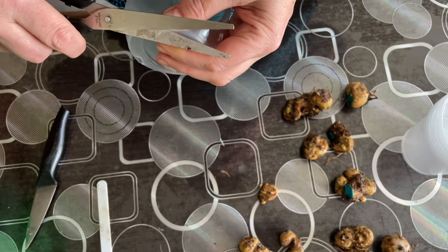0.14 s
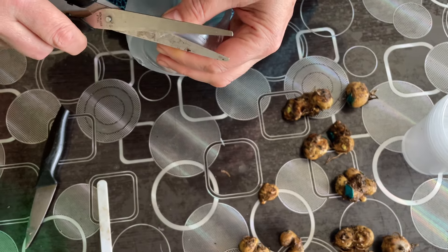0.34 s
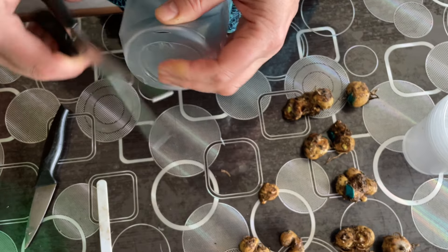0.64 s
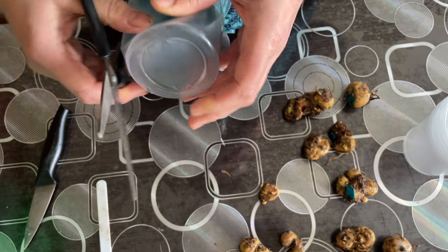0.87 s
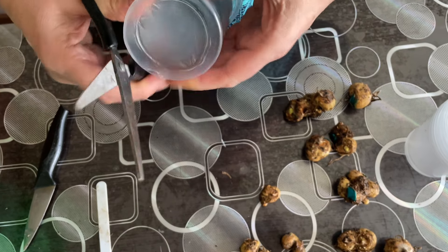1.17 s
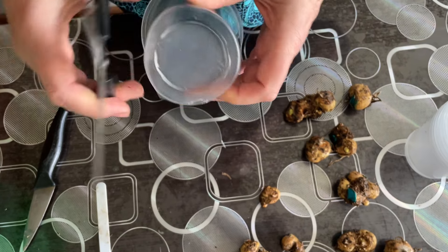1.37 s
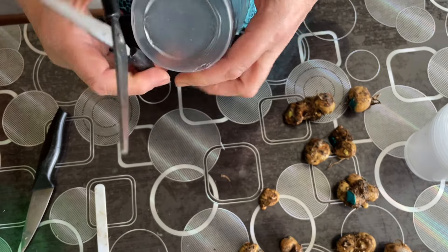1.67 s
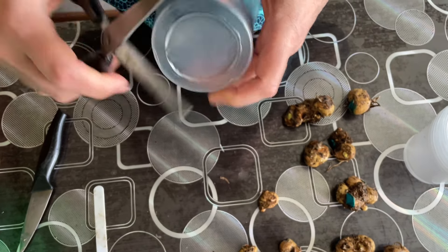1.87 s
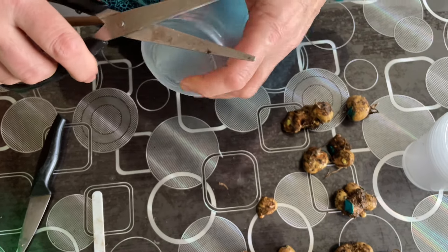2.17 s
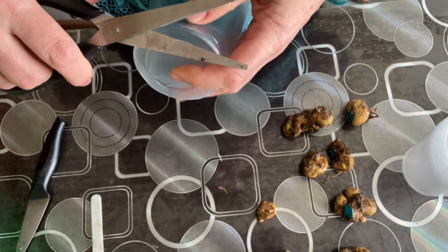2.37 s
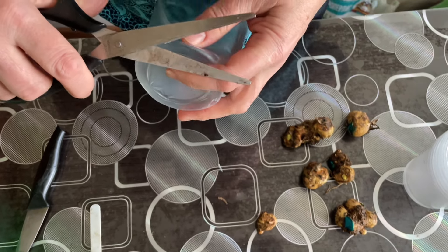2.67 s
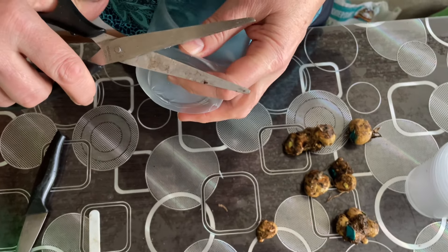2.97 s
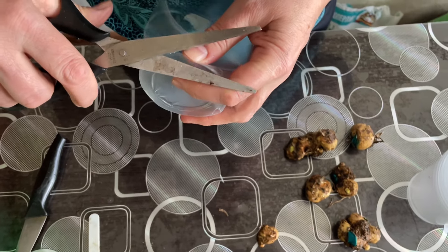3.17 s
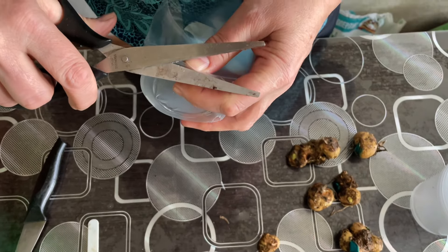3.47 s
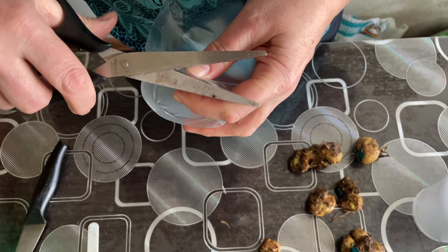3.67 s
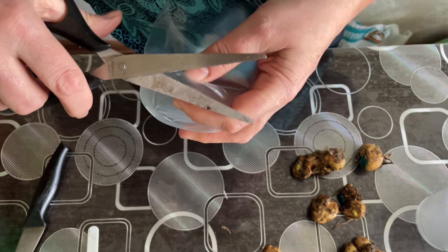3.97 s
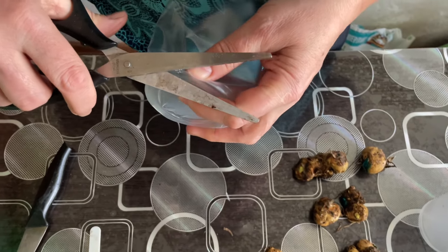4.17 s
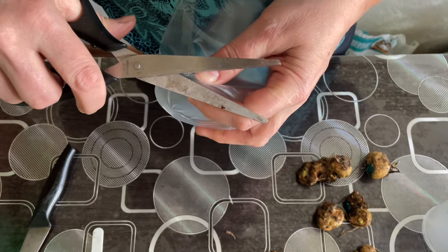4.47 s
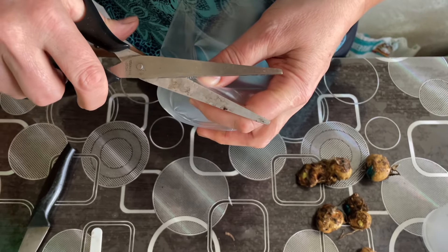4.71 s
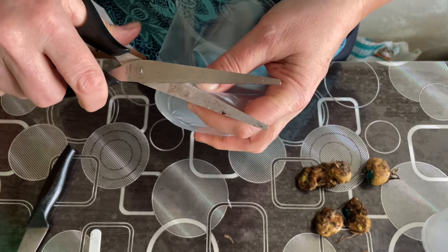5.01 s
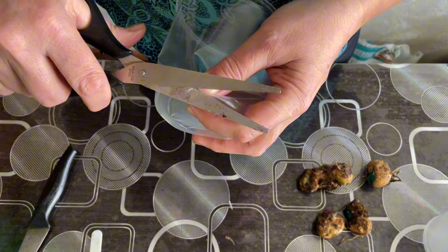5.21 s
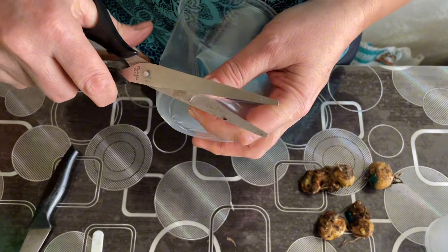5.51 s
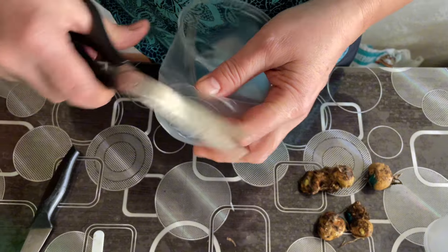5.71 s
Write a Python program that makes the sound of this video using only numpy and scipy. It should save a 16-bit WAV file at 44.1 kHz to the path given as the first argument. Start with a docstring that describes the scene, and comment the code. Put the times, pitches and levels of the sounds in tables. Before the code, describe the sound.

Sharp plastic snaps with bright metallic edge ticks, each with a short hollow ring and low thump like a quick falling chirp. They burst out densely at first, mixed with gritty scraping, then give way to softer buckling pops and occasional snips. Near the end it is almost silent before a few last cuts. Close stereo microphone, short indoor reflections, dull handling noise underneath.

```python
"""Small room: large steel scissors cut a thin plastic cup held over a table, close to the microphone.
Each cut or buckle is a noise crack, modal wall ring and gliding base thump, dispersed into a falling chirp;
cuts add a bright noise tick. Between snaps, noise grained by random slips makes the blades' scrape strokes.
Filtered noise is the hands' rumble and still air; sine swells are hollow booms; diffuse echoes are the room."""
import sys
import numpy as np
from scipy import signal
from scipy.fft import rfft, irfft, next_fast_len
from scipy.io import wavfile
from scipy.ndimage import uniform_filter1d, minimum_filter1d

SR = 44100
rng = np.random.default_rng(int(sys.argv[2]) if len(sys.argv) > 2 else 0)


def waveform_to_disk(signal):
    """Save audio, clipped to [-1, 1], as 16-bit WAV at the path in sys.argv[1]."""
    frames = np.transpose(np.atleast_2d(signal))
    scaled = np.clip(frames, -1, 1) * 32767
    samples = np.round(scaled).astype(np.int16)
    wavfile.write(sys.argv[1], SR, samples)


N = 257984
SNAP_S = 0.005  # event levels are rms over this span
THUMP_HZ = 374.6  # nominal thump pitch of cuts and crinkles


def from_db(db):
    """Amplitude gain."""
    return 10 ** (np.asarray(db) / 20)


def unit_energy(x):
    """Scale to energy 1, averaged over channels."""
    return x / np.sqrt(np.mean(np.sum(x ** 2, axis=-1)) + 1e-20)


def in_time(rows):
    """Each column of a curve at every sample."""
    t_s, *columns = np.transpose(rows)
    return [np.interp(np.arange(N) / SR, t_s, column) for column in columns]


def at_hz(points, hz):
    """Spectrum read on a log-frequency axis."""
    point_hz, level = np.transpose(points)
    return np.interp(np.log(hz + 1), np.log(point_hz), level)


def colour(x, spectrum):
    """Causal minimum-phase filter: the folded cepstrum of the spectrum gives the phase."""
    size = 4096
    gain = from_db(at_hz(spectrum, np.fft.rfftfreq(size, 1 / SR)))
    cepstrum = irfft(np.log(gain))
    cepstrum[1:size // 2] *= 2
    cepstrum[size // 2 + 1:] = 0
    response = irfft(np.exp(rfft(cepstrum)))
    return signal.fftconvolve(x, response[None], axes=-1)[:, :x.shape[-1]]


def left_right(mid, side, alike):
    """Two channels of correlation alike from two independent noises."""
    alike = np.clip(alike, -1, 1)
    return np.sqrt((1 + alike) / 2) * mid + np.sqrt((1 - alike) / 2) * side * np.array([[1], [-1]])


def stereo_noise(size, alike):
    """White stereo noise of given correlation."""
    mid, side = rng.standard_normal((2, size))
    return left_right(mid, side, alike)


def steady(x, spectrum):
    """Coloured, rms 1 over the whole scene."""
    return unit_energy(colour(x, spectrum)) * np.sqrt(N)


def pan(x, left_db):
    """Level difference, left over right."""
    return x * from_db(np.array([[left_db], [-left_db]]) / 2)


def add(track, t_s, sound):
    """Mix a short sound into the track at t_s."""
    at = max(round(t_s * SR), 0)
    track[:, at:at + sound.shape[-1]] += sound[..., :N - at]


def thump(t, hz, rise_cycles, ring_cycles, glide, settle_s):
    """Heavily damped swings; pitch sinks from (0.67 + glide) hz to 0.67 hz as the tension goes."""
    pitch_hz = hz * (0.67 + glide * np.exp(-t / settle_s))
    swing = np.sin(2 * np.pi * np.cumsum(pitch_hz) / SR)
    rise = (1 - np.exp(-t * hz / rise_cycles)) ** 2
    return unit_energy(swing * rise * from_db(-60 * t * hz / ring_cycles))


# still-air noise colour: f/Hz, relative level/dB
AIR_SPECTRUM = [(15, -17), (25, -4.5), (309, -7), (560, -18.5), (714, -9), (1400, -29.5), (5880, -19.5),
                (7110, -21), (7920, -48), (9320, -26), (12500, -29), (16000, -67)]
AIR_RMS_DB = -61.5


def still_air():
    """Steady coloured noise under everything."""
    return from_db(AIR_RMS_DB) * steady(stereo_noise(N, alike=0.46), AIR_SPECTRUM)


# hand-rumble colour: f/Hz, relative level/dB
RUMBLE_SPECTRUM = [(20, -26.5), (45, -7.5), (75, -0.5), (110, -1.5), (145, -7), (205, -1), (400, -17),
                   (900, -29.5), (2000, -65)]
# firmness of handling: t/s, finger rumble level/dB, light blade rubbing level/dB
HOLD = [(0, -48, -69), (.1, -49, -73.5), (.33, -54, -69.5), (.45, -41, -54), (1.15, -45.5, -53),
        (1.35, -52, -57), (1.55, -36, -45), (2.15, -53, -44), (2.58, -42.5, -49), (2.72, -47, -61.5),
        (3.1, -42, -53), (3.25, -40, -73), (3.36, -47, -64), (3.55, -48, -55), (4.1, -46.5, -47),
        (4.3, -56, -69), (4.44, -44, -51), (4.6, -48.5, -73), (4.829, -44.5, -84), (5.03, -73, -76),
        (5.179, -49.5, -71), (5.379, -70.5, -76), (5.5, -50, -49), (5.85, -51, -51)]


def rumble():
    """Fingers on the cup: dull noise following the hold."""
    rumble_db, _ = in_time(HOLD)
    return from_db(rumble_db) * steady(stereo_noise(N, alike=0.78), RUMBLE_SPECTRUM)


# hands jolt as the cup gives way: t/s, level/dB (rms over SNAP_S), nominal f/Hz
JOLTS = [(.375, -20.5, 227), (.381, -21, 89), (.561, -15.5, 195), (1.65, -22, 148), (1.886, -30, 100.3),
         (2.038, -26, 98.3), (3.158, -15, 127), (3.307, -21.5, 100), (4.508, -12, 196), (5.537, -30, 75)]


def jolts():
    """Hands released by the yielding cup: low damped thumps."""
    t = np.arange(SR // 5) / SR
    out = np.zeros((2, N))
    for t_s, level_db, hz in JOLTS:
        jolt = thump(t, hz, rise_cycles=0.13, ring_cycles=4.8, glide=0.93, settle_s=0.0064)
        add(out, t_s, from_db(level_db) * np.sqrt(SNAP_S * SR) * pan(jolt, left_db=3.0))
    return out


# soft hollow booms while the grip changes: t/s, length/s, peak level/dB
BOOMS = [(2.31, 0.17, -37.5), (3.94, 0.091, -36), (4.715, 0.14, -35.5), (5.12, 0.13, -40),
         (5.23, 0.097, -50.5)]


def booms(hz):
    """Hollow resonance: a sine swelling and fading under a sin^2 window."""
    t = np.arange(SR // 5) / SR
    out = np.zeros((2, N))
    for t_s, length_s, peak_db in BOOMS:
        swell = np.sin(np.pi * np.minimum(t / length_s, 1)) ** 2
        add(out, t_s, from_db(peak_db) * swell * np.sin(2 * np.pi * (hz * t + rng.random())))
    return out


# echo decay: f/Hz, t60/s
ROOM_T60_S = [(100, 0.64), (300, 0.32), (1000, 0.35), (3000, 0.38), (7000, 0.43), (14000, 0.16)]
# echoes against direct sound: f/Hz, level/dB
ROOM_LEVEL_DB = [(100, 1.5), (300, -6.5), (900, -7), (2000, -6), (6000, -10.5), (9000, -16.5), (14000, -7)]
# left-right likeness of echoes: f/Hz, correlation
ROOM_ALIKE = [(100, 1), (300, 0.93), (900, 0.19), (3000, 0.21), (6000, 1), (8500, 1), (14000, 0.7)]


def room(x, first_echo_s, build_s):
    """Diffuse echoes: noise swelling after the first reflection, dying band by band."""
    t = np.arange(SR * 3 // 4) / SR
    hz = np.fft.rfftfreq(len(t), 1 / SR)
    centres_hz = np.geomspace(80, 16000, 12)
    mid, side = rfft(rng.standard_normal((2, len(t))))
    white = left_right(mid, side, at_hz(ROOM_ALIKE, hz))
    swell = 1 - np.exp(-np.maximum(t - first_echo_s, 0) / build_s)
    response = 0
    for centre_hz, only in zip(centres_hz, np.eye(len(centres_hz))):
        band_gain = np.interp(np.log(hz + 1), np.log(centres_hz), only)
        band = irfft(white * band_gain, len(t))
        decay = unit_energy(swell * from_db(-60 * t / at_hz(ROOM_T60_S, centre_hz)))
        response = response + band * decay * from_db(at_hz(ROOM_LEVEL_DB, centre_hz))
    return signal.fftconvolve(x, response, axes=-1)[:, :N]


def moving_echoes(x, count=6):
    """Cup turned and shifted: its echo pattern crossfades slowly through count responses."""
    place = np.linspace(0, count - 1, N)
    out = 0
    for k in range(count):
        share = np.sqrt(np.maximum(1 - np.abs(place - k), 0))
        out = out + room(x * share, first_echo_s=0.0017, build_s=0.0005)
    return out


# blade strokes along the plastic: t/s, length/s, scrape level/dB, edge hiss level/dB
STROKES = [(0.362, 0.1, -35, -35), (0.815, 0.057, -35, -71), (0.89, 0.35, -36.5, -51.5),
           (1.222, 0.026, -38, -34.5), (1.453, 0.25, -32, -37.5), (1.56, 0.045, -26.5, -42),
           (1.748, 0.11, -35, -41), (1.878, 0.054, -41, -38.5), (2.125, 0.057, -47, -43.5),
           (2.23, 0.086, -40, -53), (2.47, 0.052, -54, -40.5), (2.988, 0.045, -45, -45.5),
           (3.122, 0.042, -44, -45.5), (3.766, 0.046, -34, -57.5), (3.967, 0.035, -28, -32),
           (4.108, 0.041, -27.5, -40.5), (4.903, 0.045, -57.5, -67), (5.09, .08, -56, -55),
           (5.436, .03, -53, -37.5), (5.543, 0.074, -38, -48), (5.721, 0.078, -49, -45.5)]
STROKE_ATTACK_S, STROKE_RELEASE_DB_PER_S = 0.01, 304.5
RUB_HISS_DB = -2.5  # edge hiss re light rubbing


def sliding():
    """Scrape and hiss gains: strokes rise, hold and die away, power-summed with light rubbing."""
    t = np.arange(N) / SR
    _, rub_db = in_time(HOLD)
    power = from_db([rub_db, rub_db + RUB_HISS_DB]) ** 2
    for start_s, length_s, scrape_db, hiss_db in STROKES:
        attack = np.clip((t - start_s) / STROKE_ATTACK_S, 0, 1)
        release = from_db(-STROKE_RELEASE_DB_PER_S * np.clip(t - start_s - length_s, 0, 1))
        power = power + (from_db([[scrape_db], [hiss_db]]) * attack * release) ** 2
    return np.sqrt(power)


# scrape colour: f/Hz, relative level/dB
SCRAPE_SPECTRUM = [(300, -3.5), (650, 3.5), (1000, 8), (1600, 4), (2600, -2.5), (4500, -17.5), (7000, -40),
                   (14000, -49)]
# edge-hiss colour: f/Hz, relative level/dB
HISS_SPECTRUM = [(900, 5), (2500, 5), (4000, 5.5), (6500, 7.5), (8500, -1), (12500, -3), (16000, -21.5)]


def blades(grip_s, crumb_db):
    """Stick-slip edges: dense uneven ticks and a few larger crumbs over fine hiss."""
    scrape_gain, hiss_gain = sliding()
    slips_per_s, crumbs_per_s, spread_db, smooth_share = 1100, 70, 3.5, 0.7
    sizes = from_db(spread_db * np.minimum(rng.exponential(1, N), 3))
    chance_per_sample = np.array([[slips_per_s], [crumbs_per_s]]) / SR
    slips, crumbs = (rng.random((2, N)) < chance_per_sample) * sizes
    energy = slips ** 2 + (from_db(crumb_db) * crumbs) ** 2
    # each slip's energy decays over grip_s
    grip = np.sqrt(signal.lfilter([1], [1, -np.exp(-1 / (grip_s * SR))], energy + 1e-18))
    grain = grip / grip.std() + smooth_share
    scrape = scrape_gain * steady(stereo_noise(N, alike=0.21) * grain, SCRAPE_SPECTRUM)
    hiss = hiss_gain * steady(stereo_noise(N, alike=1.0) * (grain + 1), HISS_SPECTRUM)
    return pan(scrape, left_db=1.5) + hiss


def burst(t, rise_s, t60_s, spike, alike):
    """Fracture: one sharp release, then fast-dying reflections inside the plastic."""
    envelope = (1 - np.exp(-t / rise_s)) * from_db(-60 * t / t60_s)
    x = unit_energy(stereo_noise(len(t), alike) * envelope)
    x[:, 0] += spike
    return x


def tearing(t, follow_db, wait_s, count=5):
    """Crack runs on in a few jumps at uneven gaps, tending smaller."""
    starts_s = np.cumsum(rng.exponential(1, (count, 1)) + 0.3, axis=0) * wait_s
    sizes = from_db(1.2 * rng.standard_normal((count, 1)) - 2 * np.arange(count)[:, None])
    jumps = (sizes * (t >= starts_s) * np.exp(-np.abs(t - starts_s) / 0.0015)).sum(0)
    return from_db(follow_db) * unit_energy(stereo_noise(len(t), alike=1.0) * jumps)


# cup-wall modes: f/wall pitch, relative level/dB, t60/s
WALL_MODES = [(.78, -12.5, 0.028), (0.908, 1.5, 0.032), (1.01, 2, 0.029), (1.11, -3.5, 0.038),
              (1.28, -6.5, 0.0064), (1.502, -12, 0.052)]


def wall_ring(t, hz, scatter_db, detune, port_phase):
    """Wall modes, struck differently and slightly retuned as the cup is bent."""
    ratio, level_db, t60_s = np.transpose(WALL_MODES)[:, :, None]
    tune, strike, port, start = rng.standard_normal((4, len(WALL_MODES), 1))
    phase = 2 * np.pi * hz * ratio * (1 + detune * tune) * t + 1.71 * start
    decay = from_db(level_db + scatter_db * strike - 60 * t / t60_s)
    size = decay * (1 - np.exp(-t / 0.00026))
    ports = [(size * np.sin(phase + side * port_phase * port)).sum(0) for side in (1, -1)]
    return unit_energy(np.array(ports))


# crack colour: f/Hz, relative level/dB
CRACK_SPECTRUM = [(700, -45.5), (1300, 1), (2100, 5), (3200, 1.5), (4500, -2), (6500, -2), (8000, -18),
                  (12000, -36.5)]
WALL_HZ = 932.6


def dull(x, top_hz):
    """Third-order low-pass."""
    return signal.sosfilt(signal.butter(3, min(top_hz, SR / 2.2), fs=SR, output="sos"), x)


def snap(t, crack_db, wall_db, thump_db, thump_hz, top_hz):
    """Plastic gives way: base thump, wall ring and a crack that tears on."""
    base = thump(t, thump_hz, rise_cycles=0.47, ring_cycles=5.8, glide=0.92, settle_s=0.003)
    wall_hz = WALL_HZ * (1 + rng.uniform(-0.05883, 0.053))  # bending shifts the pitch
    wall = wall_ring(t, wall_hz, scatter_db=3.0, detune=0.035, port_phase=0.29)
    split = burst(t, rise_s=0.00038, t60_s=0.016, spike=0.15, alike=0.34)
    split = split + tearing(t, follow_db=-13.5, wait_s=0.0052)
    crack = unit_energy(colour(dull(split, top_hz), CRACK_SPECTRUM))
    out = pan(from_db(thump_db) * base, left_db=0.5)
    out = out + pan(from_db(wall_db) * wall, left_db=3.5)
    return out + pan(from_db(crack_db) * crack, left_db=1.5)


# tiny buckles re light rubbing: crack level/dB, wall level/dB, thump level/dB
CRINKLE_DB = (8.5, 17, 14)
CRINKLES_PER_S, CRINKLE_SPREAD_DB = 7, 4


def crinkles():
    """Tiny buckles at random moments, levels following the light rubbing; rows as in BUCKLES."""
    hold_s, _, rub_db = np.transpose(HOLD)
    chance = rng.uniform(-1, 1, (64, 4))
    times_s = np.cumsum(1 + chance[:, 0]) / CRINKLES_PER_S
    levels_db = np.interp(times_s, hold_s, rub_db)[:, None] + CRINKLE_DB
    levels_db = levels_db + CRINKLE_SPREAD_DB * chance[:, 1:]
    return [(t_s, *db, THUMP_HZ) for t_s, db in zip(times_s, levels_db) if t_s < N / SR]


# duller pops of the buckling cup: t/s, crack, wall, thump level/dB (rms over SNAP_S), nominal thump f/Hz
BUCKLES = [(.054, -62, -48.5, -37, 454), (.382, -15.5, -20.5, -20, 328), (.558, -30, -20.5, -13.5, 391),
           (.568, -24.5, -13, -17.5, 360), (0.762, -23, -27, -29, 396), (.772, -27.5, -12, -23.5, 402),
           (.7874, -19, -5.5, -19, 540), (0.9255, -20.5, -13, -27, 440), (.968, -28.5, -25.5, -14, 380),
           (.989, -30, -12.5, -19, 440), (1.024, -40, -25, -23.5, 483), (1.068, -8, -7, -11, 424),
           (1.228, -19.5, -30.5, -21, 420), (1.4304, -24, -14, -33.5, 332), (1.546, -23, -16.5, -23, 357),
           (1.558, -37, -11, -14.5, 342), (1.582, -28.5, -17, -17, 436), (1.651, -31.5, -29.5, -19, 290),
           (1.858, -31.5, -15.5, -21.5, 360), (1.873, -24, -25.5, -16.5, 360),
           (1.9507, -30, -10.5, -23, 340), (2.032, -25.5, -21, -23.5, 506), (2.0393, -24, -17.5, -4.5, 317),
           (2.1207, -30.5, -23, -21, 423), (2.188, -29, -15, -11.5, 370), (2.323, -26.5, -25, -20.5, 336),
           (2.417, -21, -13, -8.5, 328), (2.507, -40, -23, -18, 384), (2.603, -50, -27, -53, 424),
           (2.8042, -40, -25, -55, 407), (2.8485, -27, -16, -17, 318), (3.1546, -36, -16, -6.5, 333),
           (3.3051, -67, -17.5, -9.5, 261), (3.725, -22, -12.5, -19, 442), (3.9834, -21, -13.5, -27, 337),
           (4.163, -29, -25, -25, 350), (4.505, -26.5, -15.5, -8, 368), (4.9645, -50, -43, -51, 388),
           (5.098, -42.5, -40, -60, 470), (5.1194, -38.5, -41, -49, 313), (5.539, -34, -20, -22.5, 467),
           (5.6978, -34, -27.5, -27, 400)]
BUCKLE_TOP_HZ = 6000
BUCKLE_DULLING = 0.45  # top edge sinks by this share of the dB the crack lies under its thump


def buckles(t):
    """Cup wall pops over without splitting: duller the weaker its crack against its thump."""
    out = np.zeros((2, N))
    for t_s, crack_db, wall_db, thump_db, thump_hz in [*BUCKLES, *crinkles()]:
        top_hz = BUCKLE_TOP_HZ * from_db(-BUCKLE_DULLING * max(thump_db - crack_db, 0))
        add(out, t_s, snap(t, crack_db, wall_db, thump_db, thump_hz, top_hz))
    return out


# blade-edge tick colour: f/Hz, relative level/dB
TICK_SPECTRUM = [(4000, -38.5), (6500, 9.5), (8000, 6.5), (11000, -1), (14500, -8.5), (16000, -4.5)]
# blades split the plastic: t/s, crack, wall, thump, edge tick level/dB (rms over SNAP_S)
CUTS = [(0.374, -18, -19.5, -15.5, -18.5), (0.3976, -17.5, -20.5, -35, -25.5),
        (0.5628, -9, -13.5, -18.5, -13.5), (0.6091, -16.5, -15, -29.5, -23),
        (.7792, -12.5, -33.5, -23.5, -28), (0.9821, -13, -12, -20.5, -30.5), (1.0645, -20, -17, -15, -24),
        (1.1988, -11.5, -9.5, -19.5, -29), (1.2145, -13.5, -14, -33, -18), (1.4742, -7.5, -12, -20, -16),
        (1.551, -3.5, -19.5, -9, -17), (1.7419, -9, -10.5, -14.5, -7), (1.8135, -14.5, -22, -24.5, -32),
        (1.8872, -10.5, -12, -18, -18.5), (2.0386, -15.5, -15.5, -23.5, -30),
        (2.198, -16, -8.5, -13, -33.5), (3.3904, -16.5, -19.5, -52, -17.5), (3.4295, -16.5, -23, -41, -19),
        (3.457, -23, -24.5, -40, -37.5), (3.4896, -19.5, -20, -50.5, -36), (3.73, -13.5, -21, -23, -18.5),
        (4.1719, -34, -24.5, -27, -32.5), (4.687, -16.5, -26, -51.5, -16.5),
        (5.169, -37.5, -51, -54.5, -40.5), (5.4466, -19, -28, -35.5, -15.5), (5.53, -13, -30, -24.5, -21),
        (5.534, -13, -21, -25, -22)]
CUT_TOP_HZ = 9200


def cuts(t):
    """Blades split the plastic: a bright snap plus a tick of the edges."""
    out = np.zeros((2, N))
    for t_s, crack_db, wall_db, thump_db, tick_db in CUTS:
        edge = burst(t, rise_s=0.00009, t60_s=0.011, spike=0.34, alike=1.0)
        tick = from_db(tick_db) * unit_energy(colour(edge, TICK_SPECTRUM))
        add(out, t_s, snap(t, crack_db, wall_db, thump_db, THUMP_HZ, CUT_TOP_HZ) + tick)
    return out


def disperse(x, delay_s):
    """Bending waves travel as root f, so lows lag: delay = delay_s (sqrt(1000 / f) - 1/4)."""
    size = next_fast_len(N + SR // 10)
    hz = np.fft.rfftfreq(size, 1 / SR)
    phase = 4 * np.pi * delay_s * (np.sqrt(1000 * hz) - hz / 8)
    return irfft(rfft(x, size) * np.exp(-1j * phase), size)[:, :N]


def snaps():
    """Cuts, buckles and crinkles, dispersed into falling chirps by the plastic."""
    t = np.arange(SR // 16) / SR
    return disperse(cuts(t) + buckles(t), delay_s=0.0009) * np.sqrt(SNAP_S * SR)


def scene():
    """Cup and blades sound in the room, over hands and still air."""
    background = still_air() + rumble() + jolts() + booms(hz=165.8)
    cutting = blades(grip_s=0.0005, crumb_db=8.5) + snaps()
    return cutting + moving_echoes(cutting) + background


def port_delay(x, hz, width_hz):
    """All-pass: a microphone port turns the phase once round about its resonance."""
    r = np.exp(-np.pi * width_hz / SR)
    a = [1, -2 * r * np.cos(2 * np.pi * hz / SR), r * r]
    return signal.lfilter(a[::-1], a, x)


def limiter(x, ceiling_db, release_db_per_s):
    """Looks 1 ms ahead, ducks peaks and recovers at a fixed dB rate."""
    over_db = np.maximum(20 * np.log10(np.abs(x).max(0) + 1e-9) - ceiling_db, 0)
    ramp_db = release_db_per_s * np.arange(N) / SR
    held_db = np.maximum.accumulate(over_db + ramp_db) - ramp_db
    return x * from_db(uniform_filter1d(minimum_filter1d(-held_db, size=45), size=45))


LOW_CUT_HZ, STOP_HZ = 30, 16700  # microphone bass roll-off; treble stop band


def record(dry):
    """Ports differ in treble phase; peaks are limited and clipped, bass and top treble cut."""
    right = port_delay(dry[1], hz=8670, width_hz=3030)
    right = port_delay(right, hz=15500, width_hz=3700)
    limited = limiter(np.array([dry[0], right]), ceiling_db=1.5, release_db_per_s=1002.0)
    clipped = np.clip(limited, -1, 1)
    no_bass = signal.sosfilt(signal.butter(2, LOW_CUT_HZ, "high", fs=SR, output="sos"), clipped)
    return signal.sosfilt(signal.cheby2(16, 70, STOP_HZ, fs=SR, output="sos"), no_bass)


dry = scene()
out = record(dry)
waveform_to_disk(out)
```